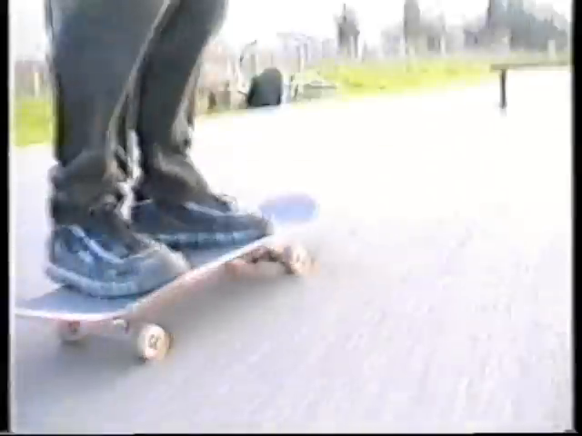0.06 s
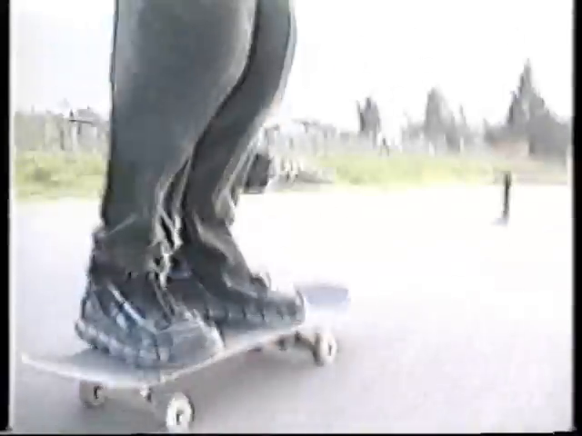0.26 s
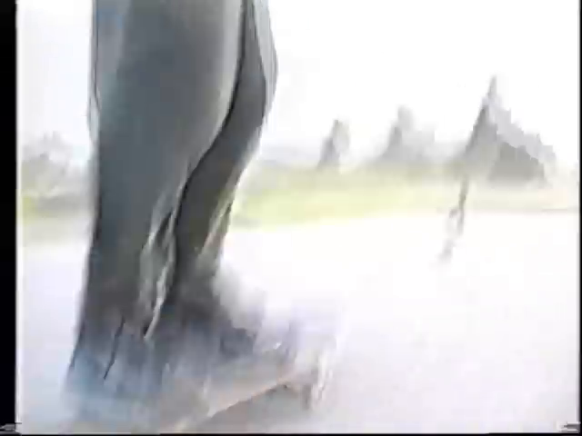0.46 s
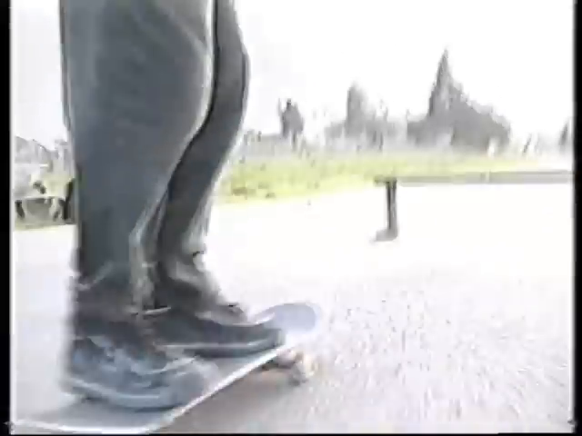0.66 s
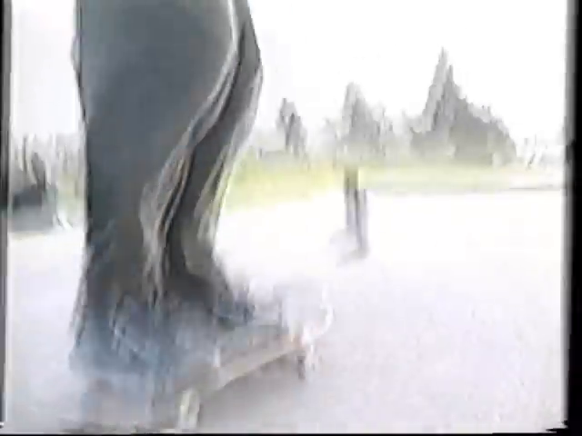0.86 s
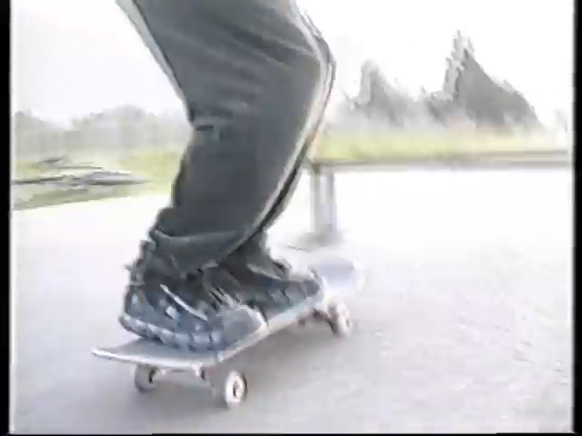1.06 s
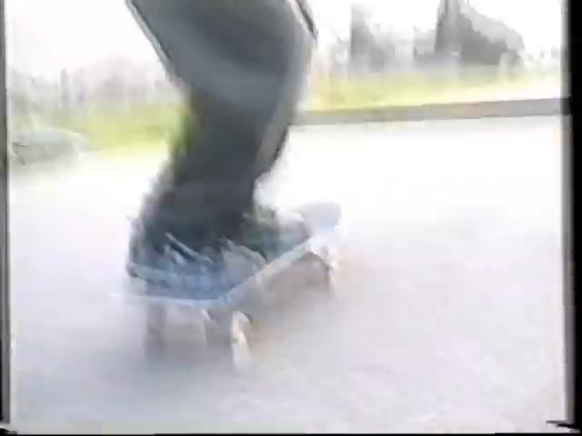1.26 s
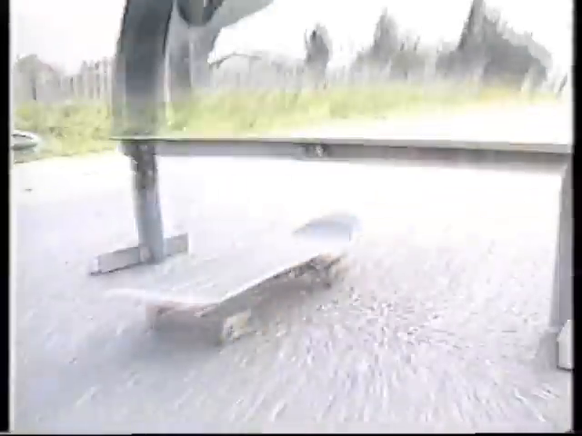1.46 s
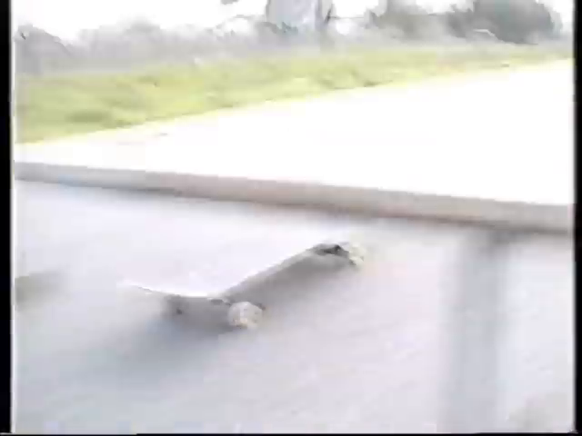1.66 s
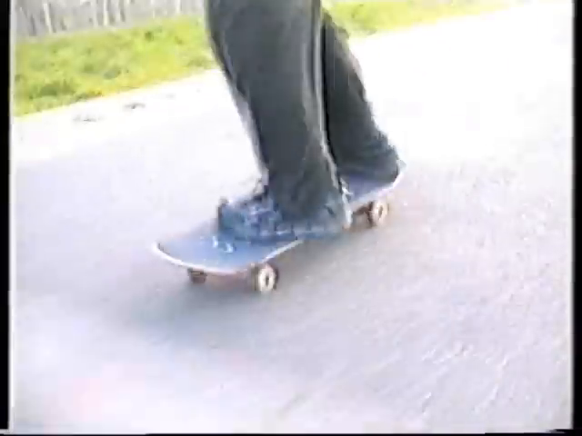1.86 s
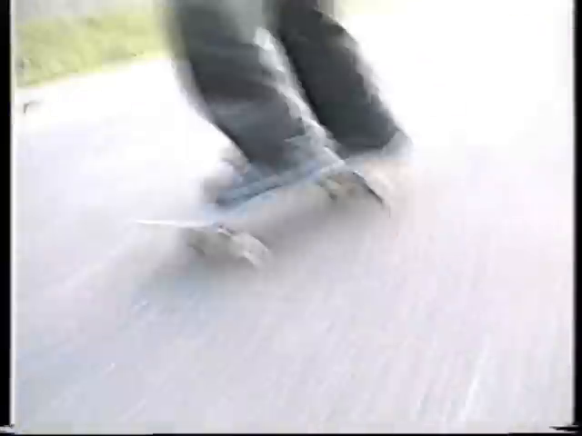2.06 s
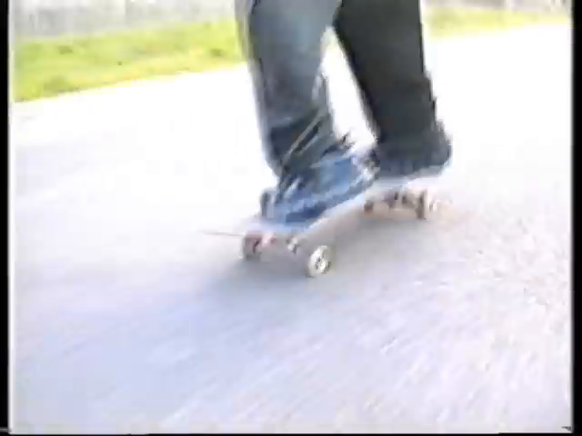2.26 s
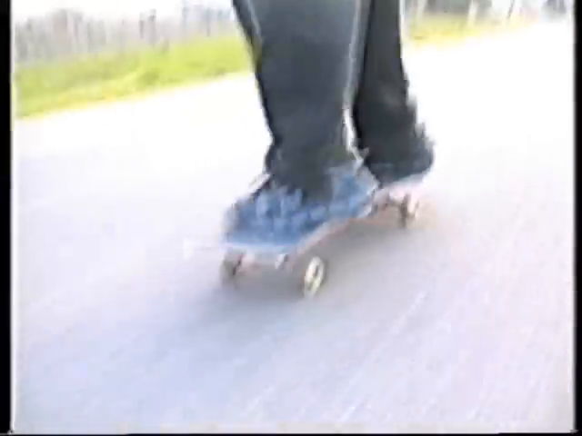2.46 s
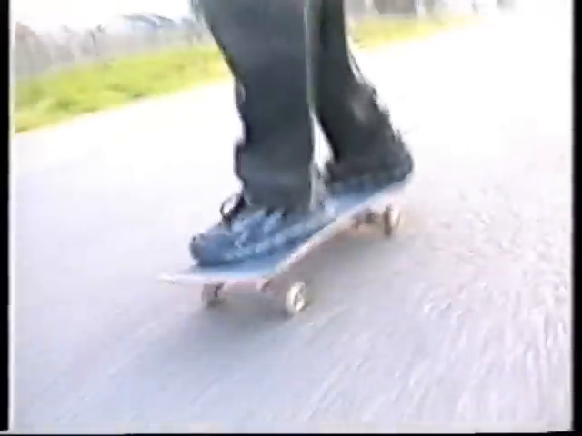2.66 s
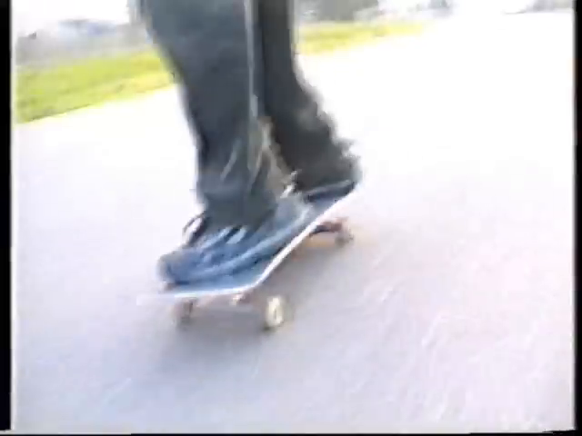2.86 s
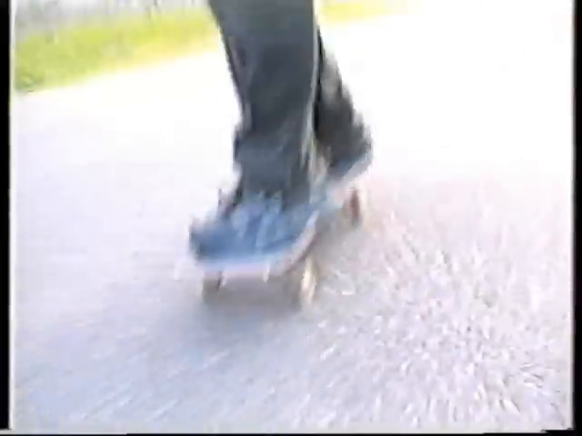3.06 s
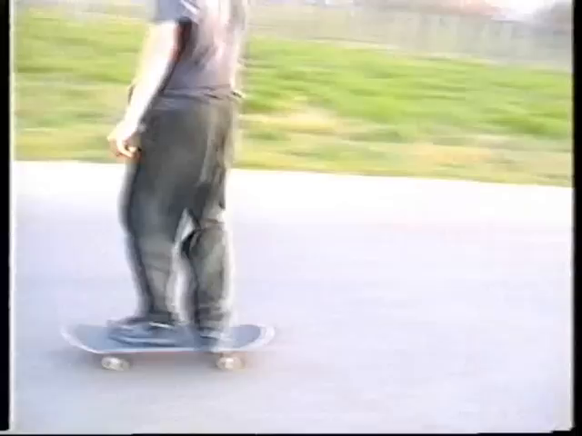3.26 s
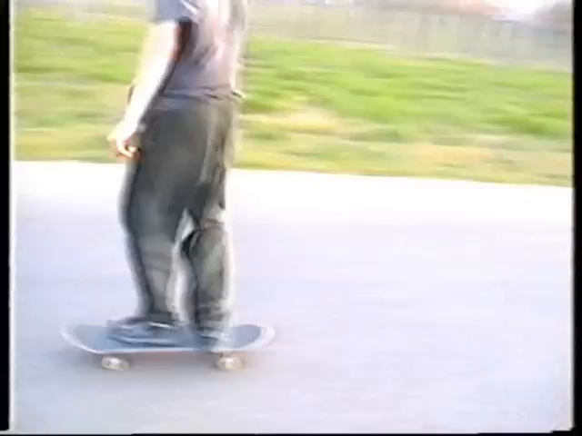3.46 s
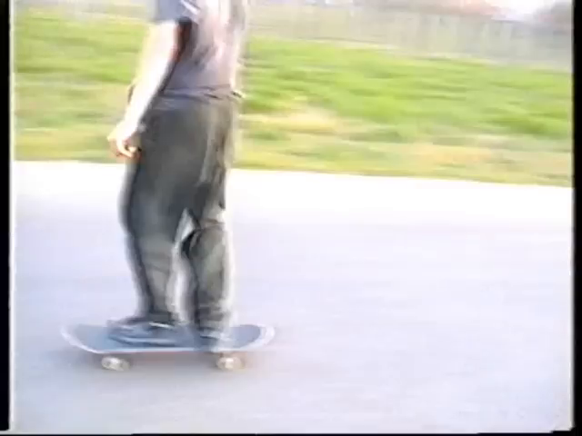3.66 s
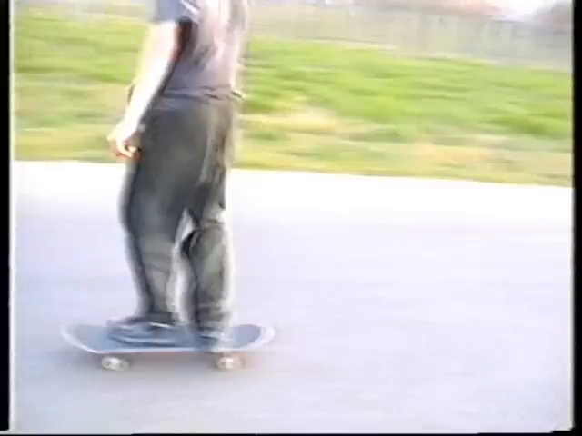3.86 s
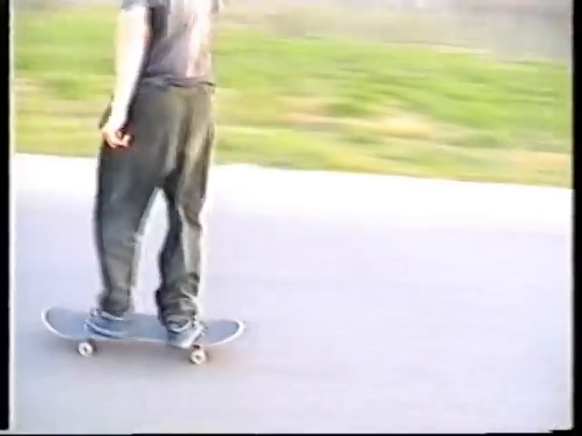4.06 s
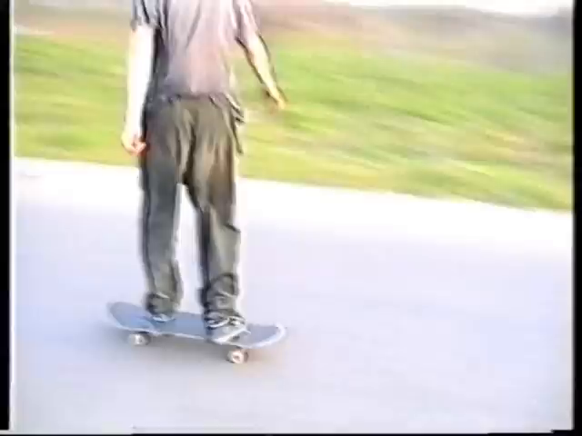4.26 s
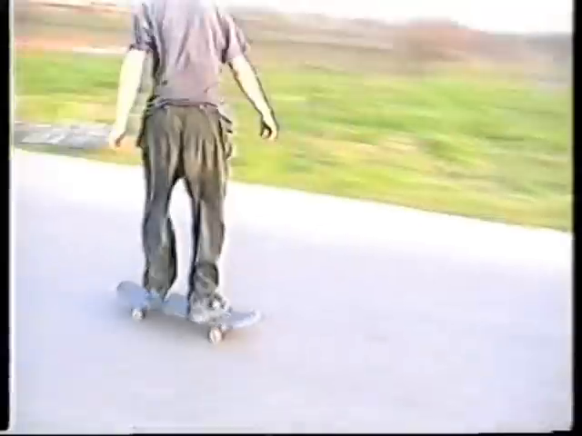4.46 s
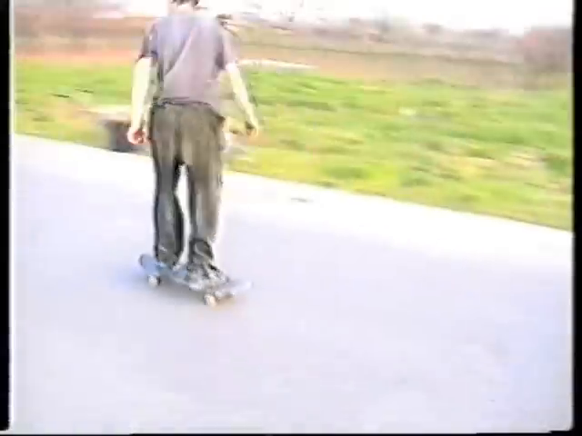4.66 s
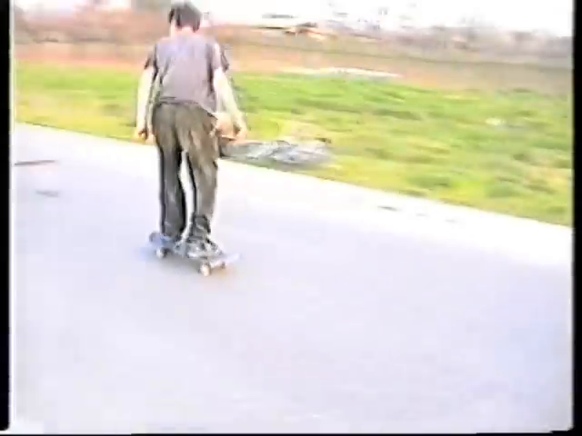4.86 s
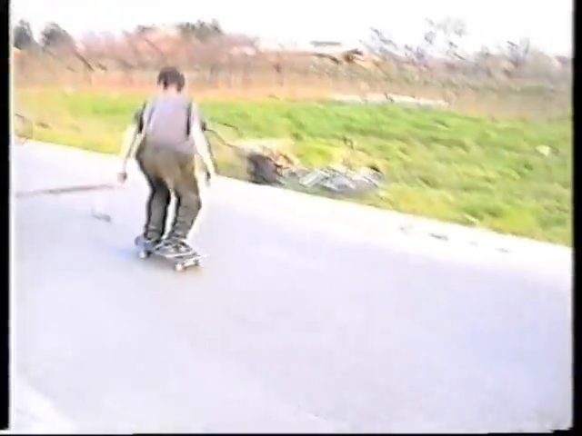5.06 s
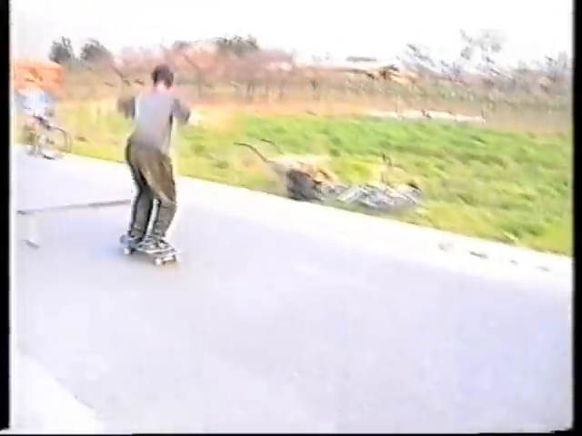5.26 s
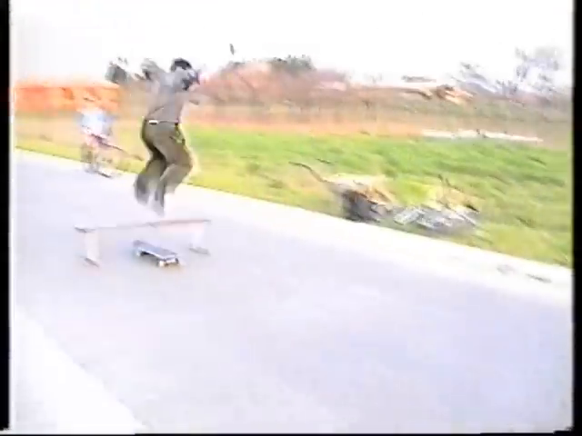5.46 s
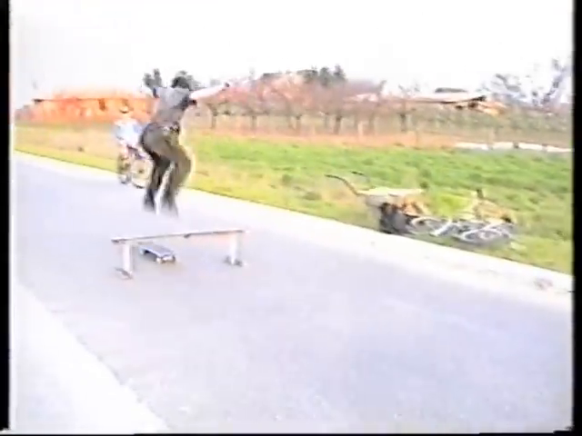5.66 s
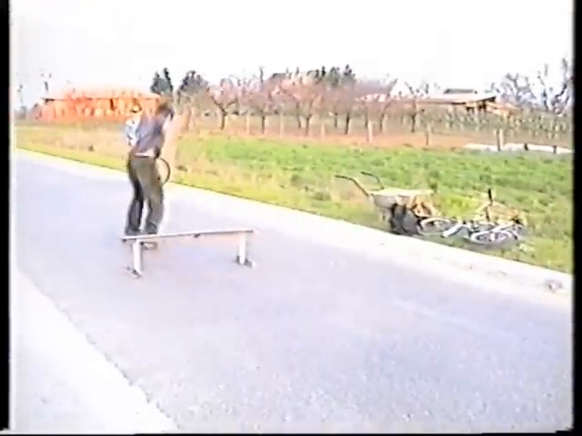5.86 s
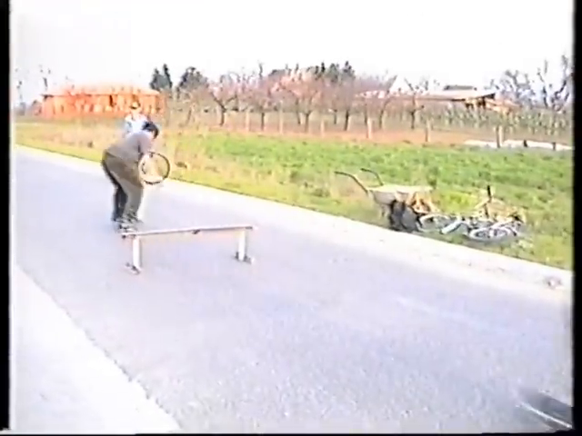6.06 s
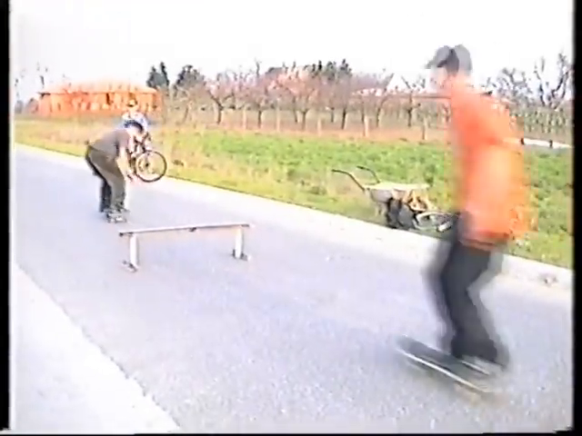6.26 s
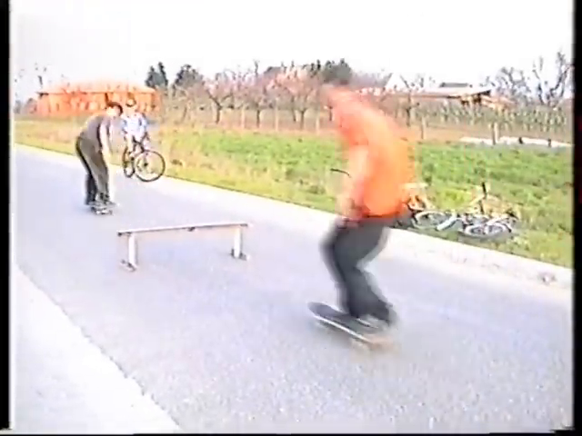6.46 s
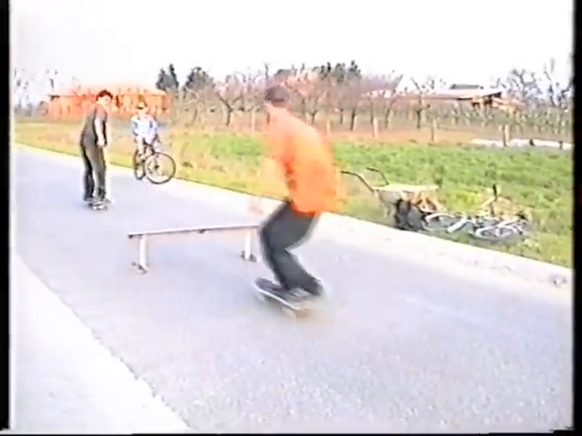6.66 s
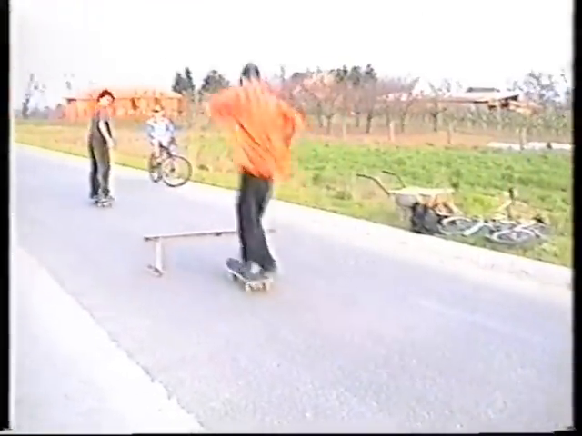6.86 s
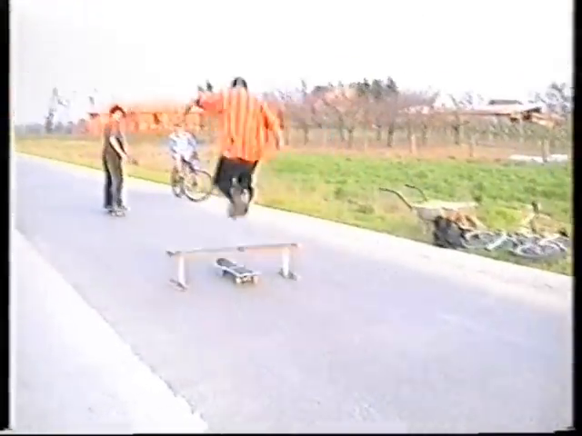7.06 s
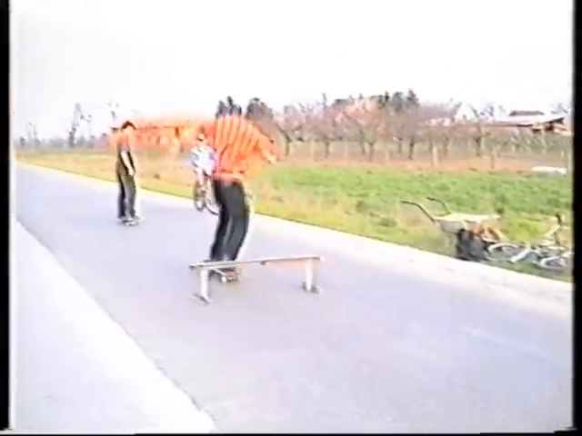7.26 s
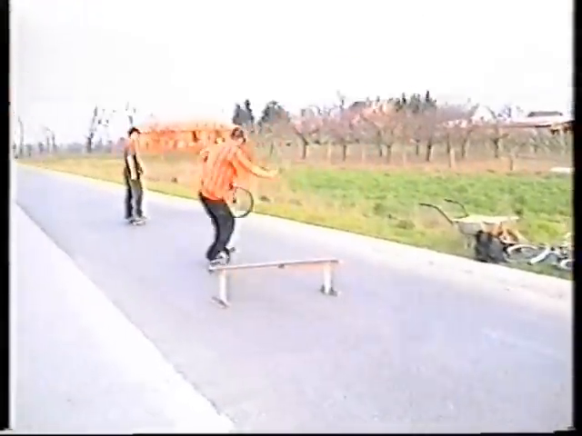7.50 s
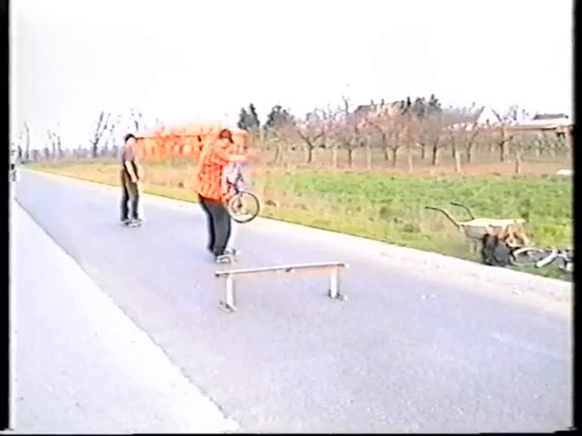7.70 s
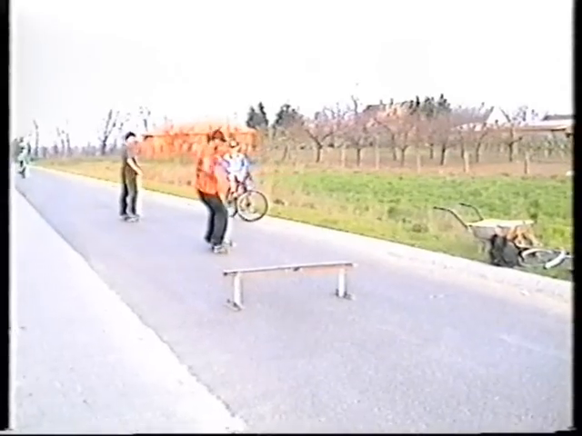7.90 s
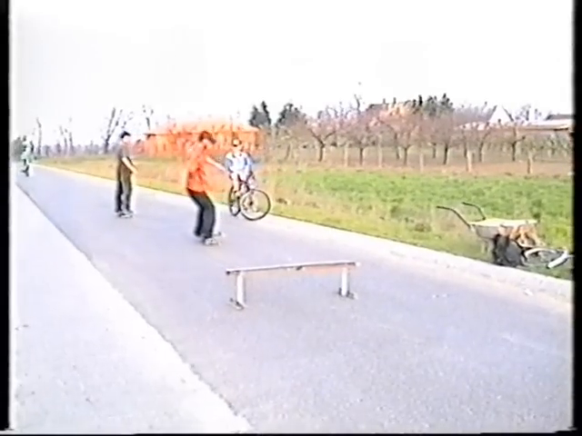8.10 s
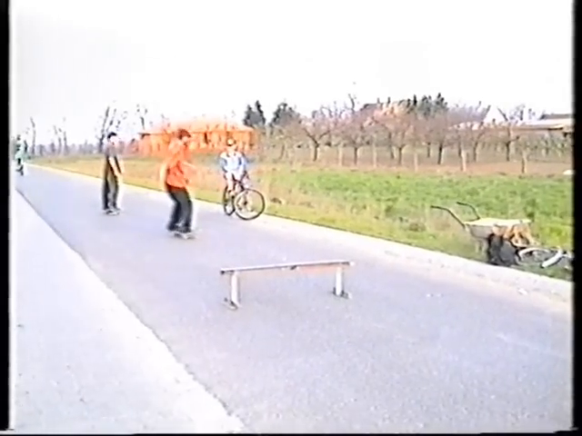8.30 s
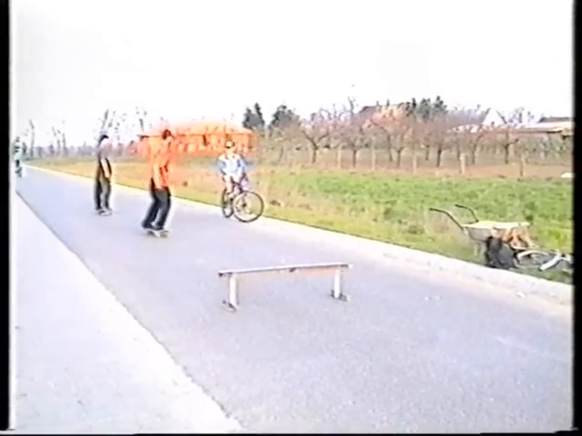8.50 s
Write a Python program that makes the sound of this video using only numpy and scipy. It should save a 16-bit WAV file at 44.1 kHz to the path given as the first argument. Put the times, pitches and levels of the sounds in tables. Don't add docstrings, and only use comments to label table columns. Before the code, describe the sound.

Steady grainy wheel rumble on an open road, picked up by a cheap camcorder with faint hiss and whine. Metal knocks lead to a hop, with a lighter roll and a heavy double thump on landing. After a click and momentary dropout, the board slaps down again and rolls on, with scrapes, a distant hissing pass and, late on, brief dulling of the treble.

```python
import sys
import numpy as np
from scipy import signal
from scipy.fft import rfft, irfft
from scipy.io import wavfile
from scipy.ndimage import uniform_filter1d, map_coordinates

SR = 44100
rng = np.random.default_rng(int(sys.argv[2]) if len(sys.argv) > 2 else 0)


def makeup_ratio(level_db):
    decades = np.asarray(level_db, float) / 20
    return 10 ** decades


def int16_out(signal):
    q = np.round(np.clip(np.atleast_2d(signal).T, -1, 1) * 32767)
    wavfile.write(sys.argv[1], SR, q.astype(np.int16))


N = 376173


def evened(x):
    return x / np.sqrt(np.mean(x ** 2) + 1e-20)


def add(mix, start_s, sound):
    part = mix[round(start_s * SR):][:len(sound)]
    part += sound[:len(part)]


def curves(rows):
    times_s, *columns = np.transpose(rows)
    return [np.interp(np.arange(N) / SR, times_s, column) for column in columns]


def spans_db(rows, edge_s):
    t = np.arange(N) / SR
    return sum(db * np.clip(np.minimum(t - start, end - t) / edge_s + 0.5, 0, 1) for start, end, db in rows)


def hump(middle_s, length_s):
    return np.exp(-((np.arange(N) / SR - middle_s) / (length_s / 2)) ** 2)


def twice_smoothed(x, width):
    return uniform_filter1d(uniform_filter1d(x, width), width)


def resonate(x, pitch_hz, width_hz):
    turn = np.exp(2j * np.pi * np.cumsum(pitch_hz * np.ones(len(x))) / SR)
    r = np.exp(-np.pi * width_hz / SR)
    smooth = signal.lfilter([(1 - r) ** 2], [1, -2 * r, r * r], x / turn)
    return 2 * (turn * smooth).real


def body(shake, modes, scale=1):
    return sum(makeup_ratio(db) * evened(resonate(shake(), hz * scale, width)) for hz, width, db in modes)


def stones(per_s, spread_db):
    bumps = np.zeros(N)
    at = np.flatnonzero(rng.random(N) < per_s / SR)
    size = np.minimum(rng.exponential(1, len(at)), 4)
    bumps[at] = makeup_ratio(spread_db * size) * (-1.) ** at
    return evened(bumps)


def patchy(seconds, depth_db):
    width = max(round(seconds * SR), 2)
    return makeup_ratio(depth_db * evened(twice_smoothed(rng.standard_normal(N), width)))


# time_s [s], roughness_db [dB], nearness_db [dB] of upper wheel tones, gain_lift_db [dB]
ROAD = [(0, 7.5, 0, 12.5), (.2, 0, 5, -1), (.95, 2, -2, -1), (1.35, 4.5, -2, -2), (2.1, 2.5, 7, 4.5),
        (2.4, -4.5, 4, 0), (2.65, -0.5, 1.5, 2.5), (3.25, 1, -5.5, 0.5), (3.5, 9, 2, 9),
        (4.1, 6, -0.5, 5.5), (4.75, -1.5, 5.5, 7), (5.3, 1, -5, 8), (5.6, 9, -10, 9.5), (5.9, 4.5, -4, 9),
        (6.25, 0.5, -4, 7.5), (7, 3, 2, 11), (7.45, 4.5, -11, 7.5), (8.53, 1.5, -3, 7.5)]


def road_and_gain():
    return curves(ROAD)


# start_s [s], end_s [s], deck_db [dB]
HOPS = [
    (1.438, 1.48, -4),
    (1.438, 1.91, -3.5),
    (1.438, 2.045, -12),
    (3.39, 3.515, -11.5),
    (6.93, 7.37, -3.5),
    (7.03, 7.36, -3),
    (7.62, 7.92, -2.5),
]


def unloading_db():
    return spans_db(HOPS, edge_s=0.03)


# middle_s [s], length_s [s], grit_db [dB], deck_db [dB], rattle_db [dB]
SCRAPES = [(0.908, 0.11, 2, 0, 2), (1.22, 0.14, -1, -4, 3), (1.428, .02, 5, 7, 19),
           (1.968, 0.12, -4, 2.5, -1), (2.047, 0.059, 1, -4.5, 10), (2.12, .06, -1, 1, 2),
           (2.263, 0.05, 6, 1, 9), (2.547, 0.18, 1, 2.5, 10), (3.71, 0.21, -5, 1, -13),
           (4.37, .1, 1, 0.5, 4), (4.93, 0.15, 4, 1.5, 1), (5.144, 0.13, 2, 1, 4),
           (5.79, 0.19, -3, -3, 1.5), (6.046, 0.16, 3.5, 0.5, 0), (6.32, 0.12, -0.5, 0, 4),
           (6.607, 0.13, 1.5, 0.5, 1), (7.126, 0.21, 3.5, 0, 2), (7.38, 0.032, 1, -1, 3),
           (7.467, 0.083, 7, -2, -1), (7.539, 0.03, 0.5, 6.5, 3), (7.62, 0.044, 5, 0, 2),
           (7.748, 0.082, 4, 2, -2), (7.885, 0.12, 3, 1.5, 5), (8.53, 0.085, 3, 4, 3)]


def scrapes_db():
    return np.transpose(SCRAPES)[2:] @ [hump(*row[:2]) for row in SCRAPES]


# start_s [s], end_s [s], level_db [dB]
DROPOUTS = [
    (7.033, 7.075, -9),
    (7.19, 7.218, -6),
]


def dropout_db(edge_s):
    return spans_db(DROPOUTS, edge_s)


# time_s [s], deck_db [dB], upper_db [dB over boom], boom_hz [Hz], upper_hz [Hz]
RIDE = [(0, -18, -7, 400, 816), (.75, -19.5, -8.5, 391, 853), (.93, -21, 1, 380, 836),
        (1.1, -17, -10.5, 416, 885), (1.42, -21, -4, 386, 790), (1.55, -23, 0.5, 285, 640),
        (2.12, -17.5, 0.5, 310, 624), (2.38, -25, 1, 302, 587), (2.7, -20.5, -1, 298, 604),
        (3.3, -19.5, -7.5, 300, 625), (3.55, -21, 1, 299, 764), (3.98, -17.5, 4.5, 316, 675),
        (4.65, -20, -3, 374, 677), (5, -21.5, 7.5, 335, 660), (5.2, -20, -8.5, 338, 680),
        (5.9, -19, -4, 399, 790), (6.9, -21.5, -3, 319, 650), (8.53, -25, -7.5, 308, 674)]
# factor on boom_hz [ratio], width_hz [Hz], level_db [dB]
BOOM_SKIRT = [(0.446, 83, -15.5), (0.684, 121, -7), (1.28, 181, -7)]
# pitch_hz [Hz], width_hz [Hz], level_db [dB]
UPPER_SKIRT = [(560, 460, -1.5), (860.4, 250, -3.5), (1055, 220, -16.5)]


def deck(coarse):
    deck_db, stance_db, boom_hz, upper_hz = curves(RIDE)
    lift_db = road_and_gain()[2]
    bass = makeup_ratio(3.5 - 0.76 * lift_db)
    boom = evened(resonate(coarse(), boom_hz, 134.0))
    boom += bass * body(coarse, BOOM_SKIRT[:1], boom_hz)
    boom = evened(boom + body(coarse, BOOM_SKIRT[1:], boom_hz))

    hollow = makeup_ratio(2 + 0.85 * stance_db)
    upper = hollow * evened(resonate(coarse(), upper_hz, 133.0)) + evened(body(coarse, UPPER_SKIRT))
    upper /= np.sqrt(1 + hollow ** 2)

    boom_db = deck_db + unloading_db() + scrapes_db()[1] - 10 * np.log10(1 + makeup_ratio(stance_db) ** 2)
    return makeup_ratio(boom_db) * boom + makeup_ratio(boom_db + stance_db) * upper


# pitch_hz [Hz], width_hz [Hz], level_db [dB]
WHEELS = [(1210, 620, 2), (1705, 530, -2.5), (2104, 930, -3)]


def wheels(fine):
    rough_db, near_db, _ = road_and_gain()
    near = makeup_ratio(near_db)
    grit = body(fine, WHEELS[:1]) + near * body(fine, WHEELS[1:])
    grit /= np.sqrt(1 + near ** 2)
    unloaded_db = 0.44 * unloading_db()
    return makeup_ratio(-40 + rough_db + unloaded_db + scrapes_db()[0] + 1.1 * dropout_db(0.0027)) * grit


# pitch_hz [Hz], width_hz [Hz], level_db [dB]
BEARINGS = [(2900, 1060, 8.5), (3410, 1140, 11), (4000, 2500, -7)]


def bearings(fine):
    rough_db, _, lift_db = road_and_gain()
    rattle_db = -59.5 + 0.12 * rough_db + 1.1 * lift_db + 0.05 * unloading_db()
    rattle_db += scrapes_db()[2] + 1.8 * dropout_db(0.0027)
    return makeup_ratio(rattle_db) * evened(body(fine, BEARINGS))


def rolling():
    road = patchy(0.0036, depth_db=1.56)
    gravel = road * patchy(0.023, depth_db=0.5)
    crush = rng.standard_normal(400) * np.exp(-np.arange(400) / 29.0)
    pebbles = gravel * evened(signal.oaconvolve(stones(150, spread_db=2.0), crush)[:N])

    def coarse():
        return road * stones(3000, spread_db=1.3)

    def fine():
        return gravel * stones(5000, spread_db=2.5) + 0.46 * pebbles

    return deck(coarse) + wheels(fine) + bearings(fine)


# pitch_hz [Hz], level_db [dB per Hz]
AIR_COLOUR = [(2650, -14), (4500, 2), (5760, -13), (6870, 8), (7690, 4.5), (8340, 8), (9740, 1.5),
              (15100, -4), (16200, -25)]


def hiss():
    pitch_hz, level_db = np.transpose(AIR_COLOUR)
    hz = np.fft.rfftfreq(N, 1 / SR)
    colour = makeup_ratio(np.interp(np.log(hz + 1), np.log(pitch_hz), level_db))
    noise = irfft(rfft(rng.standard_normal(N)) * colour, N)
    loudness = makeup_ratio(-67 + road_and_gain()[2] + dropout_db(0.004))
    return loudness * evened(noise) * patchy(0.009, depth_db=2.5)


# pitch_hz [Hz], level_db [dB]
HUM = [(28, -87), (50, -63.5), (75, -62)]


def rumble():
    return sum(makeup_ratio(db) * evened(resonate(rng.standard_normal(N), hz, 18.0)) for hz, db in HUM)


# pitch_hz [Hz], level_db [dB rms]
WHINE = [(7198, -84), (8398, -82), (9598, -84), (10197, -85), (10798, -83), (11397, -85), (11997, -85)]


def whine():
    t = np.arange(N) / SR
    return sum(np.sqrt(2) * makeup_ratio(db) * np.sin(2 * np.pi * hz * t) for hz, db in WHINE)


def ring(modes, draws, t):
    sound = np.zeros(len(t))
    for (hz, db, t60), (weaker, detune, phase) in zip(modes, draws):
        fade = makeup_ratio(db - 4 * weaker - 60 * t / t60)
        sound += fade * np.sin(2 * np.pi * (hz * (0.96 + 0.08 * detune) * t + phase))
    sound *= np.sin(np.pi / 2 * np.minimum(t / 0.002, 1))
    return sound / abs(sound).max()


# pitch_hz [Hz], level_db [dB], fade by 60 dB t60_s [s]
TRUCK = [(1220, 7, 0.012), (1493, 2.5, 0.021), (1713, -1.5, 0.034), (2153, 0, 0.016)]
# factor on the axle's pitch [ratio], level_db [dB], t60_s [s]
AXLE = [(.84, 9, 0.0096), (0.999, 6, 0.015), (1.14, 2.5, 0.017), (1.36, -7, 0.013), (1.62, -10, 0.008)]


def strike_metal(blows):
    out, t = np.zeros(N), np.arange(4000) / SR
    for start_s, level_db, axle_db, axle_hz in blows:
        noise = rng.standard_normal(len(t))
        axle_modes = [(axle_hz * factor, db, t60) for factor, db, t60 in AXLE]
        axle = ring(axle_modes, rng.random((len(AXLE), 3)), t)
        truck = ring(TRUCK, rng.random((len(TRUCK), 3)), t)
        metal = makeup_ratio(-1.0) * truck + makeup_ratio(axle_db + 6.5) * axle
        metal *= 1 + 2.2 * twice_smoothed(noise, 18)
        crack = makeup_ratio(-51 - 60 * t / 0.014) * noise * (1 - np.exp(-t / 0.0013))
        add(out, start_s, makeup_ratio(level_db) * (metal + crack))
    return out


# first_s [s], last_s [s], gap_s [s], first_db [dB], last_db [dB]
RATTLES = [
    (0.864, 0.911, .0115, -31, -17),
    (3.5643, 3.597, .018, -13.5, -26),
    (4.9337, 4.942, .012, -14.5, -23),
    (4.965, 4.974, .012, -19, -22.5),
]
# level_db [dB over the peak], pitch_hz [Hz]
RATTLE_AXLE = (-10, 2715)


def loose_truck():
    blows = []
    for first_s, last_s, gap_s, first_db, last_db in RATTLES:
        count = round((last_s - first_s) / gap_s) + 1
        for u in np.linspace(0, 1, count):
            blows.append((first_s + u * (last_s - first_s), first_db + u * (last_db - first_db), *RATTLE_AXLE))
    return strike_metal(blows)


# start_s [s], level_db [dB
# peak], axle_db [dB over the peak], axle_hz [Hz]
BLOWS = [(6.0918, -19, -24, 3020), (7.376, -19, -26, 2900), (7.4477, -20, -31, 2900),
         (7.7305, -21.5, -18, 2900), (7.7653, -20, -27, 2900), (7.884, -30, -4, 2900),
         (7.918, -31.5, 0, 2820), (7.93, -36, -2, 2780), (7.865, -34, -2, 2900), (.9234, -28, -18, 2800),
         (2.5606, -28, -11, 2500), (2.611, -29, -10, 2840), (4.5444, -26, -8, 2870),
         (0.9492, -17.5, -15, 2770), (0.9926, -19, -14, 2700), (1.1054, -27, -21, 2610),
          (1.1742, -19, -17, 2590), (1.4157, -17, -19, 2780), (1.4812, -23, -7, 3260),
          (1.5028, -10, -20, 2520), (1.5238, -25.5, -8, 3400), (1.6312, -29, -7.5, 2630),
          (1.702, -23.5, -19, 2740), (1.8844, -13.5, -8.5, 2600), (1.9153, -21, -9, 2700),
          (2.0502, -35, 2, 2750), (2.1091, -29, -7, 2800), (2.2714, -36, -2, 2850),
          (2.392, -24.5, -26, 2500), (2.4433, -27, -18, 2710), (2.5087, -24, -17, 2530),
          (2.6404, -21.5, -10.5, 3020), (3.2272, -29, -11, 2540), (3.4735, -20, -18, 3150),
          (3.5074, -15.5, -7, 2500), (3.5428, -25, -7, 2940), (3.644, -21, -11, 2900),
          (3.703, -21, -15, 3170), (3.8945, -28, -3, 2500), (4.1824, -21.5, -15, 3050),
          (4.364, -19, -10, 2900), (4.9114, -23, -11, 2630), (5.8687, -18, -14, 3300)]


def knocks():
    return strike_metal(BLOWS)


# start_s [s], level_db [dB peak], pitch_hz [Hz], t60_s [s]
THUMPS = [(1.482, -24, 257, 0.18), (1.504, -14.5, 397, 0.053), (1.629, -20, 369, 0.019),
          (1.887, -9, 282, 0.029), (1.917, -16, 685, 0.03), (2.015, -17, 300, 0.063),
          (2.05, -11, 326, 0.13), (3.425, -12, 257, 0.024), (3.451, -19, 760, 0.039),
          (3.475, -13.5, 694, 0.048), (3.506, -13.5, 542, 0.093), (3.542, -13, 314, 0.078)]


def thumps():
    out, t = np.zeros(N), np.arange(4000) / SR
    for start_s, level_db, pitch_hz, t60 in THUMPS:
        wood = [(pitch_hz, 0, t60), (180, -6, t60), (560, -4, t60), (850, -7, 1.04 * t60)]
        add(out, start_s, makeup_ratio(level_db) * ring(wood, rng.random((4, 3)), t))
    return out


# start_s [s], end_s [s]
SPLICE = (3.3449, 3.3966)


def splice(sound):
    t = np.arange(N) / SR
    swing = np.exp(-abs(t - SPLICE[0]) / 0.00021)
    before = (sound * (1 - swing) + 0.26 * swing) * (t < SPLICE[0])
    after = sound * np.clip((t - SPLICE[1]) / 0.0035, 0, 1)
    return before + after


# level_db [dB], pitch_hz [Hz], width_hz [Hz]
FAR_PASS = (-56.5, 7900, 1300)
# middle_s [s], length_s [s]
FAR_PASS_S = (5.82, .6)


def far_board():
    level_db, pitch_hz, width_hz = FAR_PASS
    passing = hump(*FAR_PASS_S) * patchy(0.01, depth_db=3.1)
    return makeup_ratio(level_db) * passing * evened(resonate(rng.standard_normal(N), pitch_hz, width_hz))


def scene():
    boards = rolling() + loose_truck() + knocks() + thumps()
    bass_cut = signal.butter(4, 120, "high", fs=SR, output="sos")
    background = hiss() + rumble() + whine() + far_board()
    return (signal.sosfilt(bass_cut, boards) + background)[None]


def convert_rate(sound):
    block, place = np.divmod(np.arange(N), 941)
    picked = (block * 1024 + np.floor(place * 48000 / 44100)) * 941 / 1024
    return map_coordinates(sound, [picked], order=3, mode="nearest")


def band_limit(x):
    return signal.sosfilt(signal.butter(12, 16370, fs=SR, output="sos"), x)


def record(dry):
    limited = 0.42 * np.tanh(dry[0] / 0.48)
    jittered = convert_rate(limited)
    treble_cut = signal.firwin(511, 15760, window=("kaiser", 9), fs=SR)
    edged = signal.oaconvolve(jittered, treble_cut, "same")
    mix = splice(edged)[None]
    return band_limit(mix)


dry = scene()
out = record(dry)
int16_out(out)
```